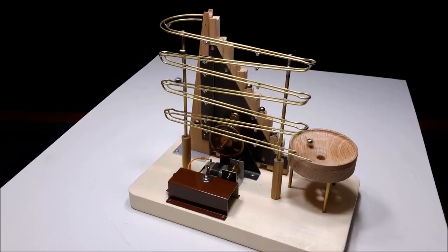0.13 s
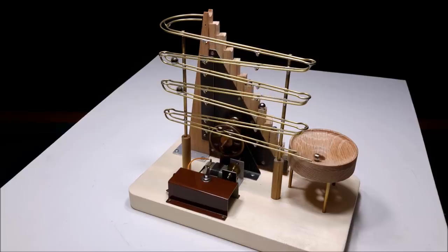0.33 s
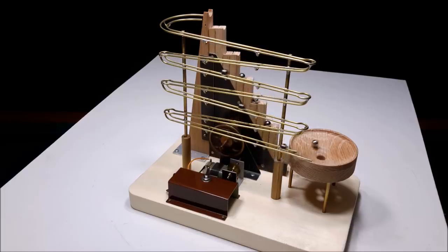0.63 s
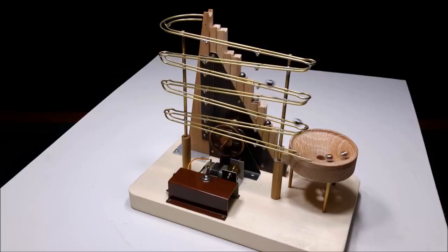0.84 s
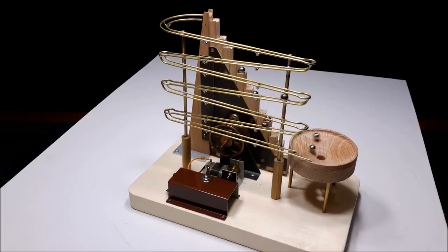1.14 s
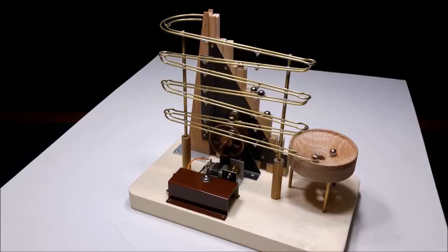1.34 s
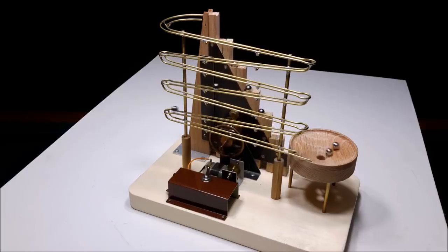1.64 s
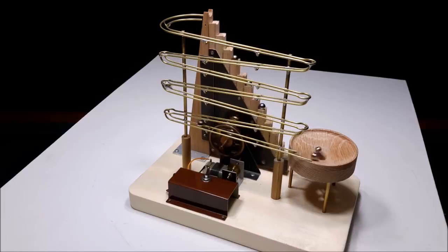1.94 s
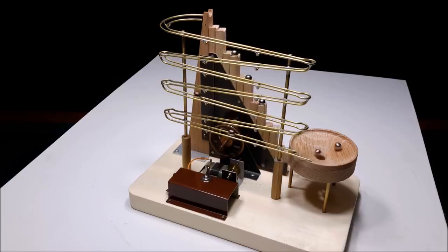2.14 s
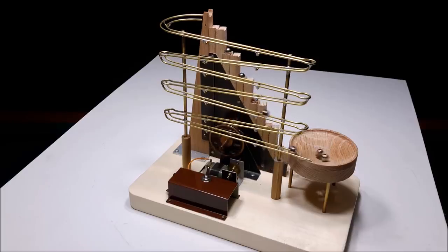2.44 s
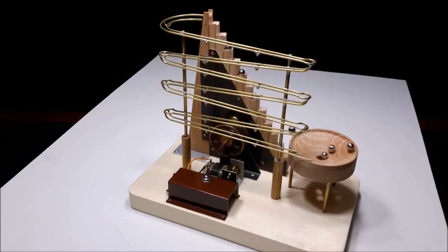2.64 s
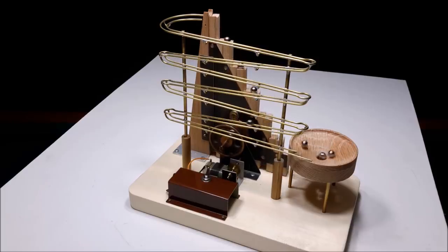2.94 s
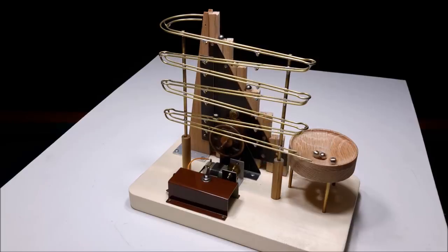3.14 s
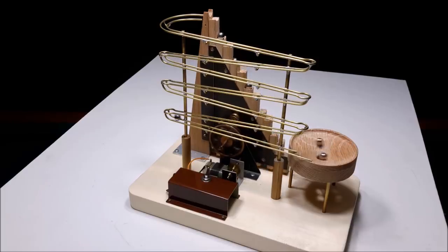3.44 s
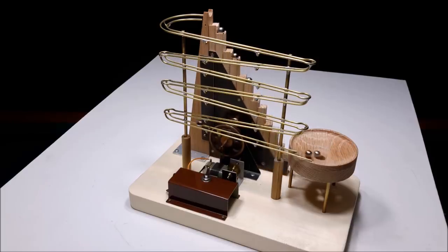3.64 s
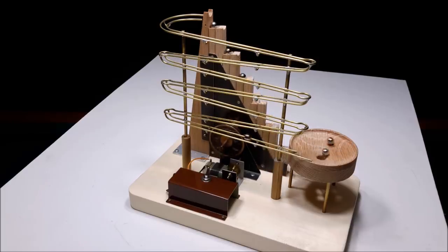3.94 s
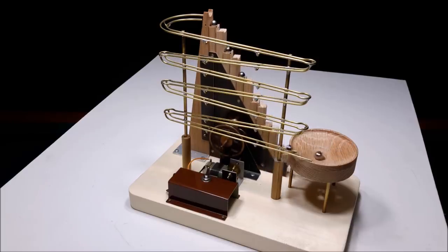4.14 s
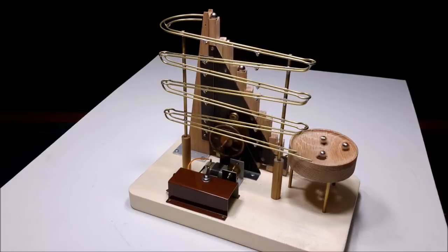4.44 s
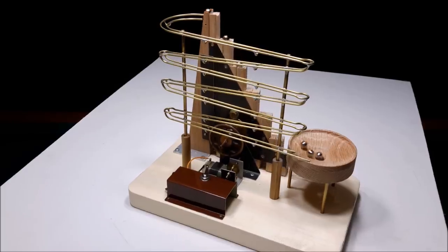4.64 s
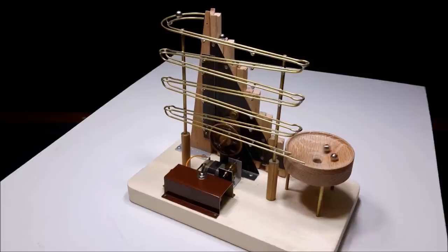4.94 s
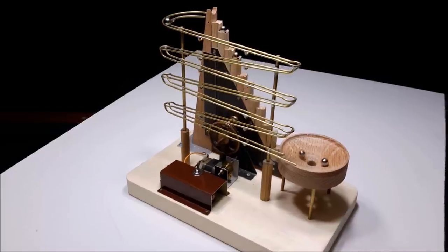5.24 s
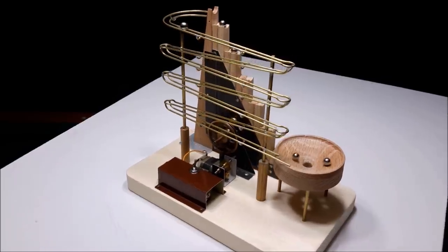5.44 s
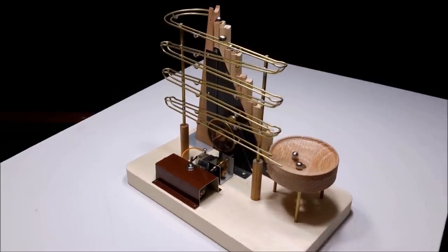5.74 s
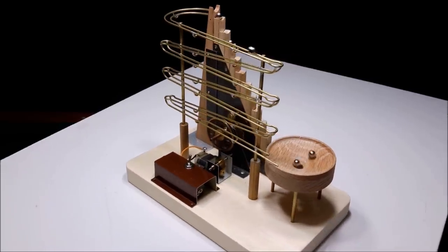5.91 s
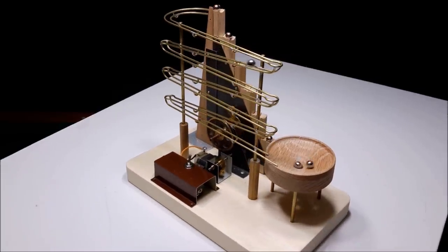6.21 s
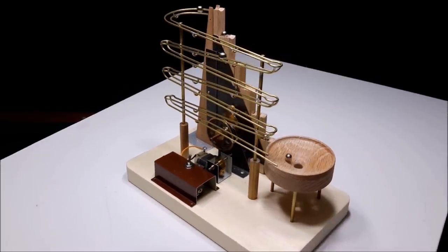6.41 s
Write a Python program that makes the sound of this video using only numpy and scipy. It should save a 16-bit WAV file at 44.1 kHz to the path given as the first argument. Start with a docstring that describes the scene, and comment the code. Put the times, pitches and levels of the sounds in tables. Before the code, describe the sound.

Steel balls click on wooden steps, clang and roll along wire rails and clink in a wooden bowl over a small geared motor's whir.

```python
"""Steel balls knock, clang and roll through a small marble machine, over the whir of its geared motor.
The balls crack against wooden steps, drop on ringing wire rails, rumble and sizzle along them and
clink together in a wooden bowl. The motor's whine sags and recovers as its cams lift the steps, while
the gears hum and grind through the base board. Soft thuds and faint room air lie underneath."""
import sys
import numpy as np
from scipy import signal
from scipy.fft import rfft, irfft, next_fast_len
from scipy.io import wavfile
from scipy.ndimage import map_coordinates

SR = 44100
rng = np.random.default_rng(int(sys.argv[2]) if len(sys.argv) > 2 else 0)


def pcm_store(signal):
    """Save signal as 16-bit PCM."""
    levels = np.round(np.clip(np.atleast_2d(signal), -1, 1) * 32767)
    wavfile.write(sys.argv[1], SR, levels.astype(np.int16).T)


N = 289737

# a ball lands or bounces on the rails:
# (time [s], level [dB], relative low ring [dB], clang level [dB], second mode of the span [Hz])
LANDINGS = [(.1465, -26, -5, -43, 2700), (.168, -32, -1, -45, 1840), (.4447, -21.5, -7.5, -41, 3170),
            (.459, -23.5, -2, -43, 2650), (1.103, -21.5, -4, -43, 1155), (1.116, -28, 3, -43, 1790),
            (1.137, -31, -2, -46, 3170), (1.202, -18.5, -14, -34, 3176), (1.217, -25, -16, -39, 3100),
            (1.879, -25.5, -5, -40, 2632), (2.13, -23, -7.5, -41, 2410), (2.777, -21.5, -8, -42, 2560),
            (2.817, -29, -2, -45, 2720), (3.557, -31, -7, -37, 1556), (3.595, -27, -7, -39, 2670),
            (3.609, -29, -8, -41, 2400), (4.911, -34, -12, -52, 2120), (5.192, -34, 3, -42, 3200),
            (5.218, -39, 0, -45, 2400), (6.2166, -21.5, -20, -37, 3220), (6.37, -36, -12, -55, 2850),
            (6.505, -31, -15, -50, 3250)]
# modes of the wire rails: (frequency [Hz], level [dB], t60 [s])
WIRE_MODES = [(1153, -9, .35), (1293, -17, .2), (1790, -15, .15), (2102, -9, .3), (2255, -6, .15),
              (2320, -8, .12), (2557, -9, .3), (2720, -8, .2), (3168, -7, .14), (3310, -12, .15),
              (3560, -15, .15), (5190, -9, .25), (5911, -14, .25), (6039, -15, .25), (7410, -3, .25),
              (7865, -2, .2), (8161, 3, .24), (8277, -3, .2), (8345, -1, .2), (8546, 1, .25),
              (8675, -2, .2), (9517, -8, .2), (9920, -15, .2), (11870, -16, .2), (12038, -16, .25),
              (12950, -22, .2)]
# the close pair of main modes of a rail span: (frequency [Hz], level [dB], t60 [s])
SPAN_MODES = [(2265, 1, .22), (2325, -7, .14)]
# spectra of the crowd of weaker rail modes, low and high: (frequency [Hz], level [dB])
RAIL_LOW_EQ = [(150, -27), (900, -9), (1250, -6.5), (1550, -5), (1850, -5), (2020, -3.5), (2270, -23),
               (2480, 2), (2720, -4.5), (2950, -2.5), (3220, -5.5), (3420, 1), (3580, -0.5), (3950, -1),
               (4500, -17.5), (5600, -5.5), (6400, -27.5)]
RAIL_HIGH_EQ = [(5000, -27), (6400, -12.5), (7300, 1.5), (8150, 0), (8700, 0), (9300, -1.5), (10600, -18.5),
                (11900, -12), (12700, -24), (13300, -20), (16000, -45)]
# ball against ball: (time [s], level [dB], pitch [Hz])
CLINKS = [(0.947, -30, 8170), (1.981, -36, 8200), (2.877, -24.5, 7400), (2.9075, -26.5, 7300),
          (2.949, -27, 7730), (2.965, -36, 7700), (3.162, -28.5, 8060), (3.2705, -35, 8100),
          (3.386, -29.5, 8450), (3.393, -30, 8200), (3.407, -31, 8200), (3.434, -29, 8200),
          (3.4914, -14.5, 8440), (3.5037, -11, 7900), (3.508, -21, 8100), (3.5355, -11, 8200),
          (3.549, -13.5, 7900), (3.556, -14.5, 8270), (3.572, -26, 8660), (3.582, -21, 8200),
          (3.594, -15.5, 8420), (3.733, -29.5, 8000), (3.772, -31, 8050), (4.117, -35, 8410),
          (4.5597, -20.5, 8150), (5.153, -10, 8100), (5.176, -25, 7900), (5.1895, -9, 8100),
          (5.207, -18, 8200), (5.218, -17, 8100), (5.223, -19, 8200), (5.283, -31, 8200),
          (5.328, -34, 8200), (5.364, -25.5, 8200), (5.4006, -29, 8200), (6.279, -23, 7640)]
# ball against wood: (time [s], peak level [dB], hardness as treble tilt [dB/octave])
KNOCKS = [(0.037, -29, -4), (.954, -32, -8), (0.979, -21, -1), (0.9939, -19, 1.5), (1.155, -24, -13),
          (1.662, -30.5, 9), (1.686, -32.5, -2), (2.704, -23, -5), (2.711, -24, -6), (2.836, -21.5, -8),
          (2.8778, -21, -10), (2.907, -25, 6), (2.9493, -26, 9), (3.298, -32, -4), (3.387, -32, 3),
          (3.7723, -28, 3), (4.117, -25.5, 11), (4.421, -22.5, -4), (4.432, -22.5, 6), (4.4522, -25.5, -13),
          (4.559, -23.5, -9), (4.615, -30.5, -21), (5.4012, -28, -3), (5.734, -31.5, 6), (6.487, -28, 0)]
# modes of the wooden steps and bowl: (frequency [Hz], level [dB], t60 [s])
WOOD_MODES = [(1500, -14, .03), (2300, -5, .05), (2750, -3, .035), (3200, 1, .035), (3520, -1, .028),
              (4100, -5, .02), (4900, -3, .016), (5600, -7, .014), (8300, -5, .014)]

# a ball gathers speed along a rail until it reaches the bend:
# (time at its fastest [s], rumble [dB], sizzle [dB], fizz [dB], run-up [s])
RUNS = [(.03, -51.5, -51, -64, .3), (.52, -52, -48, -56.5, 1), (1.14, -43, -43, -52.5, 0.69),
        (1.9, -47.5, -46.5, -60, 0.48), (2.52, -49.5, -48.5, -56, 0.99), (2.82, -44, -46, -60, 0.64),
        (3.58, -46, -46.5, -59, 0.58), (4.38, -47.5, -46.5, -56.5, 0.9), (4.62, -48.5, -64, -74, .15),
        (4.95, -49.5, -46, -64, .14), (5.22, -49.5, -45.5, -60, 0.2), (5.85, -54, -49, -61, 0.48),
        (6.22, -50, -50, -57.5, 0.82), (6.55, -57, -47, -66, 0.17)]
# spectra of the wires' sizzle and of a fast ball's top fizz: (frequency [Hz], level [dB])
SIZZLE_EQ = [(5000, -12), (6400, -12), (7200, -0.5), (7550, 1.5), (8000, 3), (8700, -3.5), (10000, -15),
             (10700, -29.5), (11400, -15.5), (13000, -33), (16000, -67)]
FIZZ_EQ = [(7500, -16), (9400, 7.5), (10200, 3.5), (12000, -9.5), (13200, -15.5), (16000, -27)]
# ring of a rolling ball's light tap on the wires: (frequency [Hz], level [dB], t60 [s])
TAP_MODES = [(1350, -11, .06), (2300, -4, .07), (2750, -3, .06), (3220, 0, .05), (3600, -6, .04),
             (8100, -5, .03)]

# the cams lift a heavy and a light set of steps in turn, and each lift brakes the motor:
# (time of greatest load [s], speed lost [turns/s], build-up [s], release [s])
LIFTS = [(.02, 18.8, .25, .26), (.685, 11.8, .316, .397), (1.571, 20.2, .267, .3),
         (2.333, 12.2, .302, .251), (3.227, 21.3, .304, .257), (3.984, 13.5, .401, .228),
         (4.868, 20.9, .322, .251), (5.575, 12.7, .34, .271), (6.534, 22.3, .325, .261)]
# the mechanism snags and slips free: (time [s], speed gained [turns/s])
SNAGS = [(.61, -1), (.76, 1), (.83, -2.2), (2.11, .9), (2.19, -1), (2.37, -.8), (3.78, .7), (3.89, -1.5),
         (3.95, .7), (4.05, -1.2), (5.34, 1.2), (5.48, -1.3), (5.55, .7), (5.63, -1)]
# the whine fades as the listener moves round the machine: (time [s], level [dB])
WHINE_FADER = [(0, -47), (4.6, -48), (5.4, -49), (6, -51.5), (6.57, -51.5)]
# peaks and notches of the motor can: (frequency [Hz], level [dB])
CAN_EQ = [(1000, -25), (3900, -17), (4200, -6), (4330, -3), (4400, 2.5), (4460, -2), (4540, -4),
          (4630, -12), (4700, -3), (4770, 0), (4870, -7), (5040, -9), (5350, -20), (6400, -26), (7900, -8),
          (12000, -36)]
# low shaft tones: (order [multiple of shaft speed], level [dB])
GEAR_ORDERS = [(3, -65), (4, -75), (7, -75), (8, -77), (9, -79), (10, -78), (16, -73), (21, -74), (22, -71),
               (23, -73)]
# resonances of the base board, gearbox plates and frame: (frequency [Hz], width [Hz], level [dB])
BOARD_PEAKS = [(229.3, 19.5, 0.5), (304, 46, -10.5), (496, 180, -13.5), (711, 28, -9.5), (875.6, 14, -7.5),
               (1168, 6.9, 0.5), (1328, 115, -9), (2304, 98, -2), (2950, 390, -21.5)]
PLATE_PEAKS = [(1715, 70, -6), (1805, 48, 0), (1865, 55, -8)]
FRAME_PEAKS = [(1153, 15, -2.5), (1241, 30, -5.5), (1295, 25, -7), (2255, 66, 1)]

# dull bumps on the base: (time [s], peak level [dB])
BUMPS = [(3.092, -43.5), (3.44, -45), (3.582, -43.5), (4.91, -43), (5.111, -47), (5.407, -44),
         (6.386, -44.5), (6.412, -36.5)]
# the base's answer to a bump: (frequency [Hz], level [dB], t60 [s])
BASE_MODES = [(221.6, 9.5, 0.13), (304, -1, 0.18), (373.6, -1.5, 0.17), (816, -2.5, 0.15)]
# spectrum of the room air: (frequency [Hz], level [dB])
AIR_EQ = [(20, 21), (45, -45), (90, 8.5), (140, 9.5), (300, -9), (500, 3), (1000, -2), (3000, -2),
          (16000, -34)]
# the hiss dips briefly: (time [s], length [s])
HISS_DIPS = [(.405, .045), (.667, .02), (1.217, .016), (1.79, .035), (2.045, .04), (3.05, .035),
             (3.145, .017), (3.376, .018), (3.956, .02), (4.042, .022), (4.491, .02), (4.741, .022),
             (4.806, .02), (4.874, .016), (5.109, .016), (5.383, .02), (5.599, .018), (5.872, .02),
             (6.231, .014)]

SETTLE_S, SETTLED_DB_PER_S = .045, 260  # once the ball has settled it damps the span
JOSTLES_PER_S, TAPS_PER_S = 11, 170
RUN_FADE_S = .55  # a run dies away by 20 dB in this time
FREE_TURNS_PER_S, LOAD_SHAPE = 89.86, 1.87  # unloaded shaft speed; exponent of the load's bell shape
SLACK_TURNS_PER_S = 76.6  # above this speed the gears run slack and rattle in their plates
BOOM_ORDER, BOOM_HZ, BOOM_WIDTH_HZ = 8, 700, 18  # this gear tone booms at a resonance of the board


def landings():
    """A ball drops on the wires with a bright snap; the span clangs and many weaker modes ring."""
    wash, tones, t = np.zeros(N), np.zeros(N), np.arange(SR // 4) / SR
    is_low = np.array(WIRE_MODES)[:, :1] < 6500
    snap_eq = [(1500, -24), (3200, -8), (6300, -11), (8800, 4.5), (12300, -8), (14000, -23)]
    envelope = attack(t, .0007) * amp(-SETTLED_DB_PER_S * np.maximum(t - SETTLE_S, 0))
    for s, db, low_db, clang_db, second_hz in LANDINGS:
        high = coloured(partials(t, 5500, 15500, count=48), RAIL_HIGH_EQ)
        low = coloured(partials(t, 600, 6200, count=60), RAIL_LOW_EQ)
        crowd = (high + amp(low_db) * low) * decay(t, t60=.22)
        snap = amp(7.5) * coloured(noise(len(t)), snap_eq) * decay(t, t60=.034)
        wires = (ring(WIRE_MODES, t, scatter_db=3.5, detune=.001) * amp(is_low * (low_db + 4))).sum(0)
        clang = ring(SPAN_MODES + [(second_hz, 1, .13)], t, scatter_db=1, detune=.008).sum(0)
        add(wash, s, amp(db - 13) * (crowd + snap) * envelope)
        add(tones, s, (amp(db - 15) * wires + amp(clang_db) * clang) * envelope)
    return wash * hiss_dips() + tones


def partials(t, low_hz, high_hz, count):
    """The rail modes that one spot happens to excite, scattered over a band."""
    hz = low_hz + (high_hz - low_hz) * (np.arange(count) + rng.random(count)) / count
    sizes, phases = rng.rayleigh(size=count), rng.uniform(0, 2 * np.pi, count)
    return sizes @ np.sin(2 * np.pi * hz[:, None] * t + phases[:, None])


def clinks():
    """Ball meets ball: one bright ping of a few milliseconds, echoed by the bowl and the table."""
    out, t = np.zeros(N), np.arange(SR // 20) / SR
    rise_s = .0004
    for s, db, hz in CLINKS + jostles(level_db=-39, colour=8200):
        ping = unit_peak(t ** 2 * np.exp(-t / rise_s) * np.sin(2 * np.pi * hz * t))
        splash = coloured(noise(len(t)), RAIL_HIGH_EQ) * attack(t, rise_s) * decay(t, t60=.022)
        add(out, s, amp(db - 3) * (ping + amp(-13.5) * splash))
        add(out, s + rng.uniform(.002, .003), amp(db - 10) * ping)
    return out


def knocks():
    """Balls drop from step to step and into the bowl: a crack and short wooden modes."""
    out, t = np.zeros(N), np.arange(SR // 8) / SR
    octaves = np.log2(np.array(WOOD_MODES)[:, :1] / 3200)
    crack_eq = [(300, -9), (1500, 0), (3200, 5), (5500, 0), (8500, -2), (10000, -8), (14000, -40)]
    for s, db, hardness in KNOCKS + jostles(level_db=-42, colour=.5):
        tilt = amp((hardness + 3) * octaves)
        body = (ring(WOOD_MODES, t, scatter_db=2.5, detune=.05) * tilt).sum(0)
        crack = 1.5 * coloured(noise(len(t)), crack_eq) * decay(t, t60=.016)
        add(out, s, amp(db) * unit_peak((body + crack) * attack(t, .0004)))
    return out


def jostles(level_db, colour):
    """Balls nudge faintly at random: (time [s], level [dB], colour [clink pitch or knock hardness])."""
    count = int(JOSTLES_PER_S * N / SR)
    times = (np.arange(count) + rng.random(count)) / JOSTLES_PER_S
    return [(s, level_db + 2 * rng.standard_normal(), colour) for s in times]


def rolling():
    """Tiny bumps under the rolling balls keep the rails ringing."""
    def contacts(rough_db):
        """Noise with the fast, uneven grain of steel rolling on wire."""
        return noise() * amp(rough_db * wobble(500) + 1.1 * wobble(35))

    rumble_db, sizzle_db, fizz_db = rolling_levels()
    wire_peaks = [(hz, 2.2 / t60, db) for hz, db, t60 in WIRE_MODES if hz < 4000]
    singing = amp(rumble_db - 5) * resonant(contacts(rough_db=2), wire_peaks)
    rumble = amp(rumble_db - 2) * coloured(contacts(rough_db=5.5), RAIL_LOW_EQ)
    sizzle = amp(sizzle_db) * coloured(contacts(rough_db=1.5), SIZZLE_EQ)
    fizz = amp(fizz_db) * coloured(contacts(rough_db=3), FIZZ_EQ)
    taps = amp(-57.5 + .82 * (rumble_db - rumble_db.mean())) * chatter()
    return (rumble + sizzle + fizz + taps) * hiss_dips() + singing


def rolling_levels():
    """Faders for rumble, sizzle and fizz, in dB: every run swells to the bend and dies away."""
    t = np.arange(N) / SR
    power = amp([[-74.5], [-54.5], [-78]]) ** 2  # some ball is always rolling
    for s, rumble_db, sizzle_db, fizz_db, run_up in RUNS:
        swell_db = -20 * np.maximum((s - t) / run_up, (t - s) / RUN_FADE_S)
        power = power + (amp([[rumble_db], [sizzle_db], [fizz_db]]) * amp(swell_db)) ** 2
    return 10 * np.log10(power)


def chatter():
    """A rolling ball skips from wire to wire: many light taps, each with a short ring of its own."""
    out, t = np.zeros(N), np.arange(SR // 12) / SR
    for s in rng.uniform(0, N / SR, int(TAPS_PER_S * N / SR)):
        tap = ring(TAP_MODES, t, scatter_db=3, detune=.015).sum(0) * attack(t, .0005)
        add(out, s, amp(rng.uniform(-8, 0)) * unit_peak(tap))
    return unit_rms(out)


def motor():
    """One shaft drives whine and gears; the frame rings along and the board drones louder under load."""
    speed = shaft_speed()
    surplus = speed - speed.mean()
    whine_db, = curves(WHINE_FADER)
    jitter = 1 + .005 * wobble(14) + .003 * wobble(110)  # uneven teeth: a waver and a fast flutter
    angle = 2 * np.pi * np.cumsum(speed * jitter) / SR
    whine = amp(whine_db + .066 * surplus) * commutator(angle)
    gears = gear_hum(angle, surplus) + gear_grind(angle, speed, surplus, whine_db)
    drone_peaks = [(222.7, 15.3, .5), (306, 22, -3.5)]
    drone = amp(-64.5 - .07 * surplus + wobble(7)) * resonant(noise(), drone_peaks)
    off_resonance = np.hypot(1, (BOOM_ORDER * speed - BOOM_HZ) / BOOM_WIDTH_HZ)
    boom = amp(-63.5 + 2.6 * wobble(8.1)) * np.sin(BOOM_ORDER * angle) / off_resonance
    frame = amp(-59.5 + 2 * wobble(5)) * resonant(noise(), FRAME_PEAKS)
    return whine + gears + drone + boom + frame


def shaft_speed(snag_s=.035):
    """Turns per second: the free speed less the drag of each lift, with small snags."""
    t = np.arange(N) / SR
    drag = sum(lost * np.exp(-np.abs((t - s) / np.where(t < s, build, release)) ** LOAD_SHAPE)
               for s, lost, build, release in LIFTS)
    waver = sum(gained * np.exp(-((t - s) / snag_s) ** 2) for s, gained in SNAGS)
    return FREE_TURNS_PER_S - drag + waver


def commutator(angle):
    """Three slightly unequal bars sing in the motor can: every third shaft harmonic stands out."""
    orders = np.arange(48, 73)
    strong = orders % 3 == 1
    levels_db = np.where(strong, 0, -8.5) - .35 * np.abs(orders - 57)
    phases = rng.standard_normal(len(orders)) * np.where(strong, .55, np.pi)
    tones = sum(amp(db + 2 * wobble(12)) * np.cos(k * angle + phase + .15 * wobble(25))
                for k, db, phase in zip(orders, levels_db, phases))
    brushes = noise() * (1 + .5 * np.cos(3 * angle))
    return coloured(tones, CAN_EQ) + amp(-6.5) * coloured(brushes, CAN_EQ)


def gear_hum(angle, surplus):
    """Low shaft harmonics that swell as the load slows the gears."""
    tones = sum(amp(db - .1 * surplus + 3 * wobble(9)) * np.sin(k * angle + .5 * wobble(18))
                for k, db in GEAR_ORDERS)
    return np.sqrt(2) * tones


def gear_grind(angle, speed, surplus, whine_db):
    """Teeth bite unevenly: a pulsing grind in the board and a rattle in the plates, louder at speed."""
    mesh = sum(amp(3 * wobble(6)) * np.sin(k * angle + rng.uniform(0, 2 * np.pi)) for k in range(5, 42))
    teeth = unit_rms(noise() * amp(1.5 * wobble(70))) + .2 * unit_rms(mesh)
    pulsing = amp(2 * wobble(45) + 1.5 * wobble(12)) * (1 + .5 * np.cos(angle))
    # as the whine fades, the board recedes with it and the plates come forward
    board_db = -54 + .46 * (whine_db - whine_db.mean()) + .21 * surplus
    plates_db = -58.5 + .65 * (whine_db[0] - whine_db) + .43 * np.maximum(speed - SLACK_TURNS_PER_S, 0)
    grind = amp(board_db) * resonant(teeth * pulsing, BOARD_PEAKS) * hiss_dips()
    rattle = amp(plates_db) * resonant(teeth, PLATE_PEAKS)
    return grind + rattle


def bumps():
    """The base thuds softly now and then in its low modes."""
    out, t = np.zeros(N), np.arange(SR // 6) / SR
    for s, db in BUMPS:
        thud = ring(BASE_MODES, t, scatter_db=2, detune=.03).sum(0) * attack(t, .0027)
        add(out, s, amp(db) * unit_peak(thud))
    return out


def reflections(x, t60):
    """A short diffuse answer from the table and walls."""
    t = np.arange(SR // 3) / SR
    tail = noise(len(t)) * decay(t, t60) * (t > .003)
    return signal.fftconvolve(x, tail / np.linalg.norm(tail))[:N]


def room_air():
    """A faint bed of low rumble and hiss."""
    return amp(-64.5) * coloured(noise(), AIR_EQ) * hiss_dips()


def hiss_dips(depth_db=10):
    """A gain that ducks the hiss briefly while the tones carry on."""
    t = np.arange(N) / SR
    notches = [np.exp(-np.minimum(np.abs(2 * (t - s) / length), 2) ** 4) for s, length in HISS_DIPS]
    return amp(-depth_db * np.max(notches, axis=0))


def ring(modes, t, scatter_db, detune):
    """Damped modes, one row each; every blow varies their strength, tuning and phase."""
    hz, db, t60 = np.transpose(modes)[:, :, None]
    size, shift, phase = rng.standard_normal((3, len(modes), 1))
    tones = np.sin(2 * np.pi * (hz * (1 + detune * shift) * t + phase))
    return amp(db + scatter_db * size) * decay(t, t60) * tones


def resonant(x, peaks):
    """x through resonances of alternating polarity, at rms 1."""
    return unit_rms(filtered(x, lambda f: sum(
        (-1) ** k * amp(db) * 1j * f * width / (hz * hz - f * f + 1j * f * width)
        for k, (hz, width, db) in enumerate(peaks))))


def coloured(x, eq):
    """x through an EQ curve, at rms 1."""
    hz, db = np.transpose(eq)
    return unit_rms(filtered(x, lambda f: amp(np.interp(np.log(f + 1), np.log(hz), db))))


def filtered(x, response):
    """x with its spectrum multiplied by response(frequency)."""
    size = next_fast_len(len(x) + 8192)
    return irfft(rfft(x, size) * response(np.fft.rfftfreq(size, 1 / SR)), size)[:len(x)]


def wobble(rate):
    """A smooth random curve, rate knots a second."""
    return map_coordinates(noise(int(N * rate / SR) + 4), [np.arange(N) * rate / SR])


def curves(rows):
    """One value per sample for each column after the time."""
    times, *columns = np.transpose(rows)
    return [np.interp(np.arange(N) / SR, times, column) for column in columns]


def add(track, s, sound):
    """Mix a sound in at time s."""
    part = track[max(round(s * SR), 0):][:len(sound)]
    part += sound[:len(part)]


def noise(length=N):
    return rng.standard_normal(length)


def attack(t, rise_s):
    return 1 - np.exp(-t / rise_s)


def decay(t, t60):
    return amp(-60 * t / t60)


def amp(db):
    return 10 ** (np.asarray(db) / 20)


def unit_rms(x):
    return x / np.sqrt(np.mean(x ** 2) + 1e-20)


def unit_peak(x):
    return x / np.abs(x).max()


def scene():
    """The mono mix: hits with a tight room sound, over motor, rolling and air."""
    hits = landings() + clinks() + knocks() + bumps()
    bed = room_air() + motor() + rolling()
    return (hits + bed + amp(-9) * reflections(hits, t60=.064))[None]


def record(dry, top_hz=16200):
    """A brick-wall low-pass trims the very top."""
    return np.array([filtered(x, lambda hz: hz < top_hz) for x in dry])


dry = scene()
out = record(dry)
pcm_store(out)
```